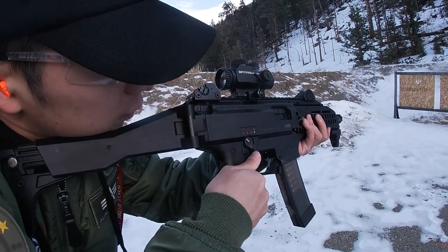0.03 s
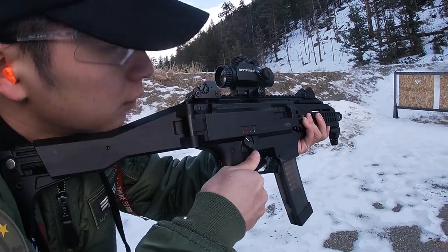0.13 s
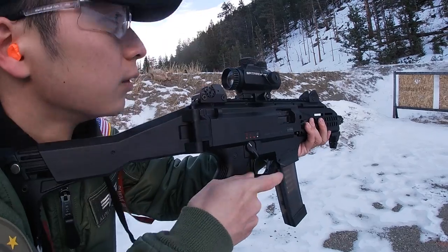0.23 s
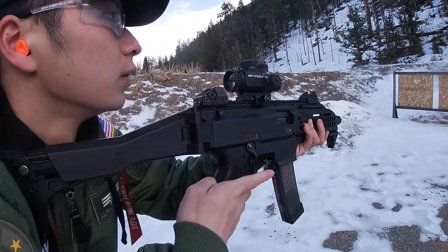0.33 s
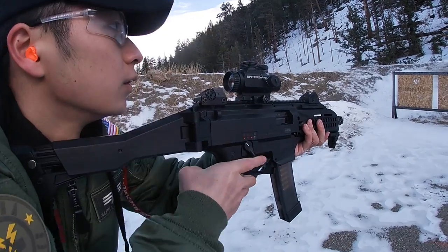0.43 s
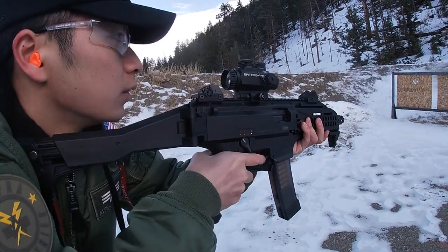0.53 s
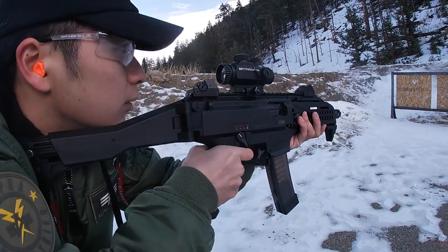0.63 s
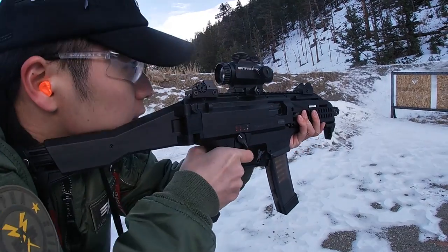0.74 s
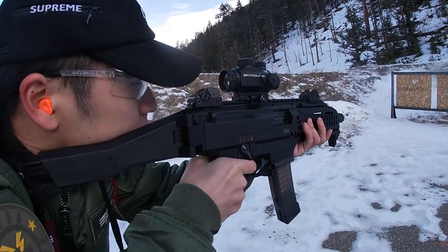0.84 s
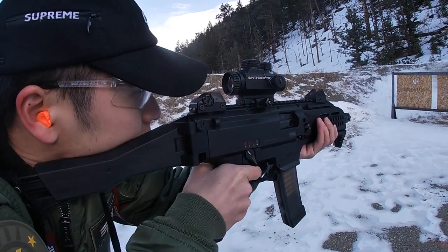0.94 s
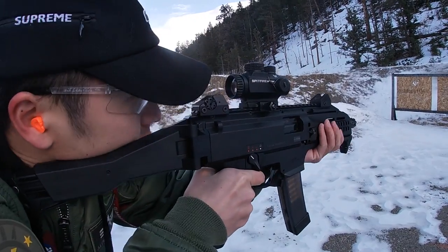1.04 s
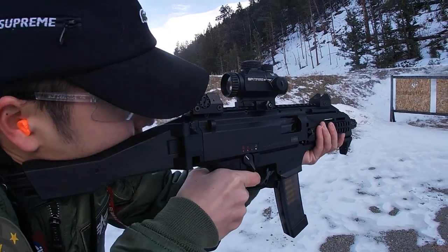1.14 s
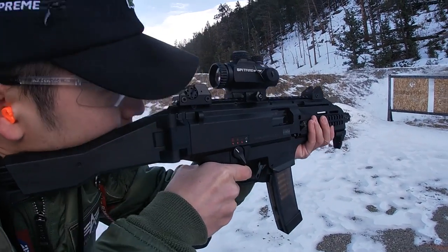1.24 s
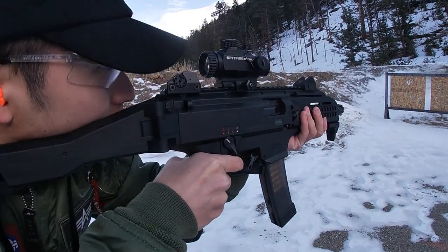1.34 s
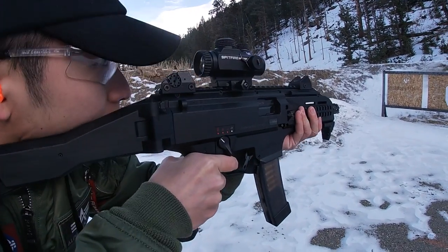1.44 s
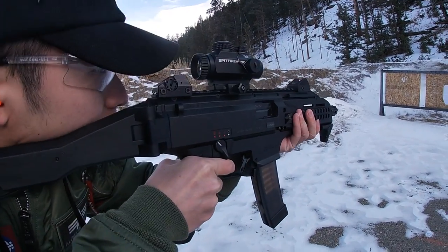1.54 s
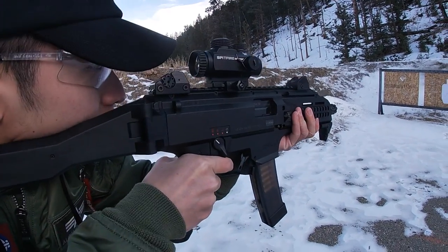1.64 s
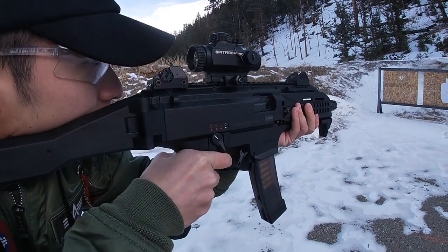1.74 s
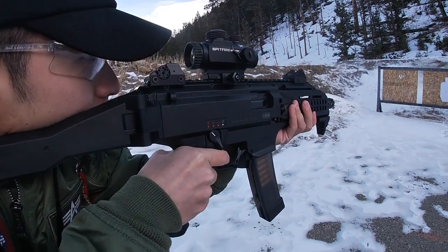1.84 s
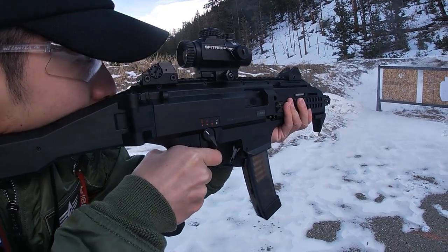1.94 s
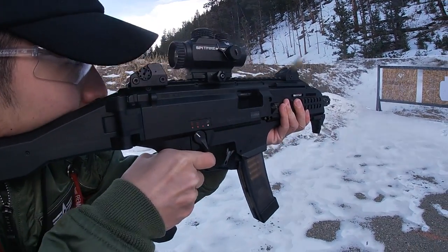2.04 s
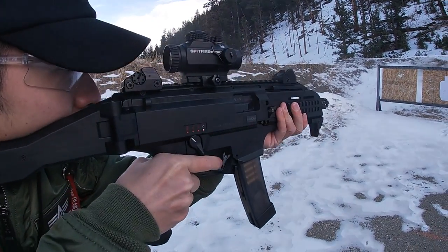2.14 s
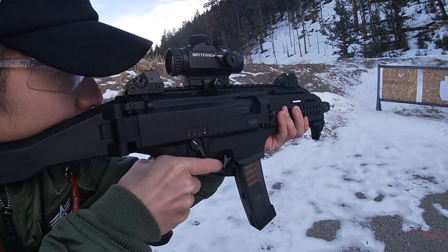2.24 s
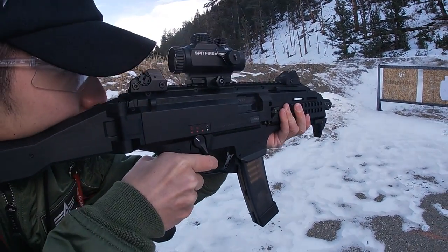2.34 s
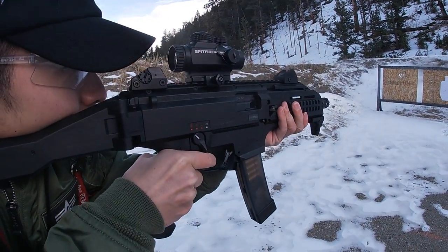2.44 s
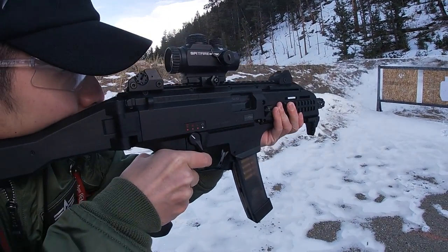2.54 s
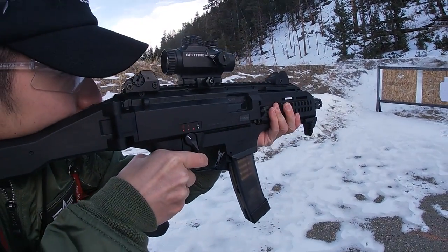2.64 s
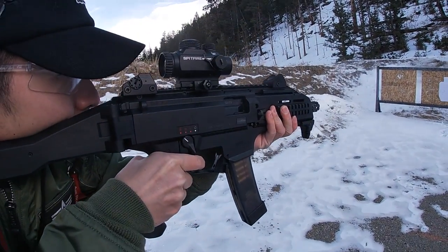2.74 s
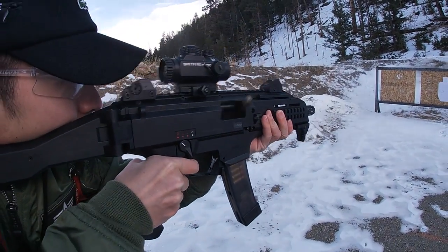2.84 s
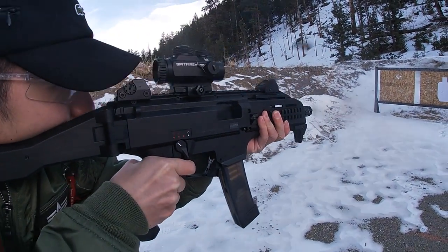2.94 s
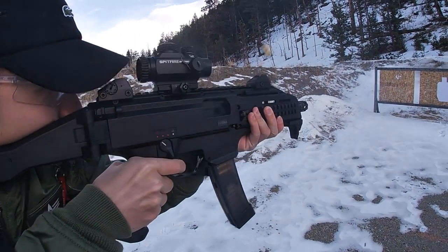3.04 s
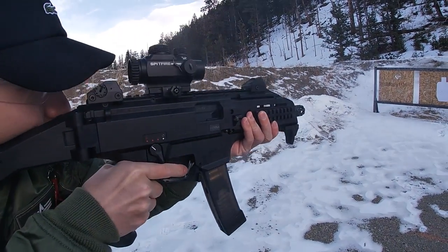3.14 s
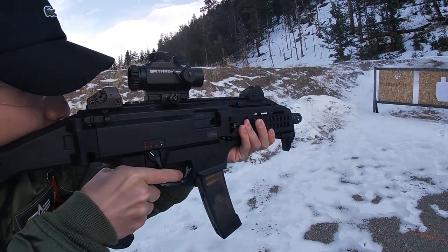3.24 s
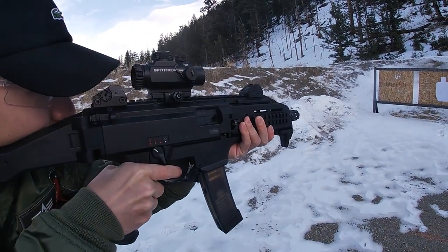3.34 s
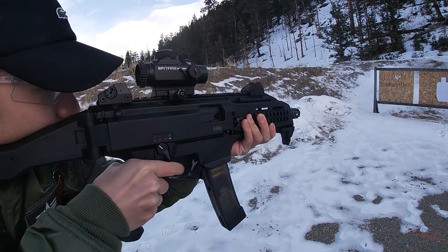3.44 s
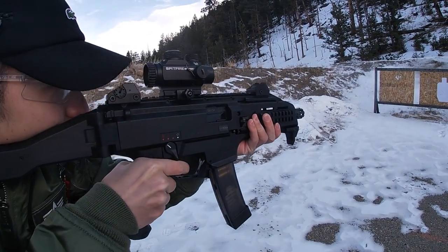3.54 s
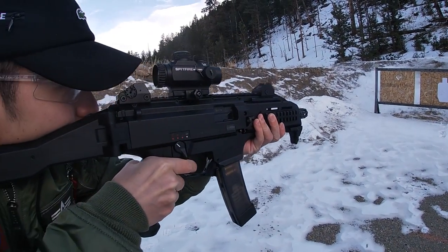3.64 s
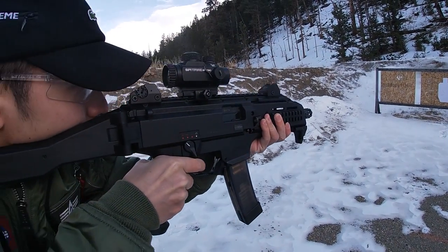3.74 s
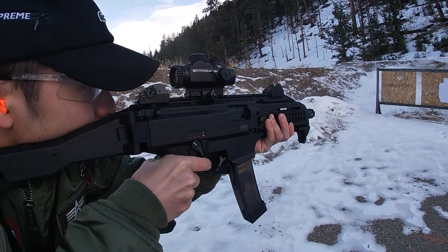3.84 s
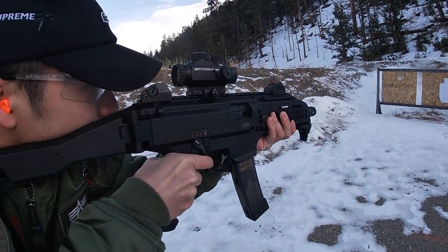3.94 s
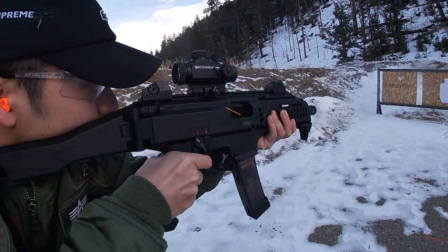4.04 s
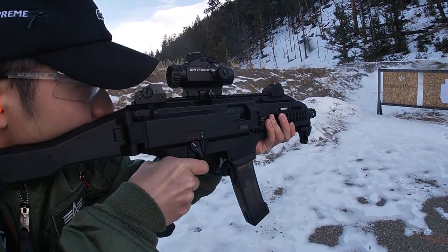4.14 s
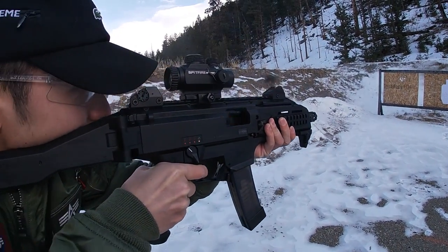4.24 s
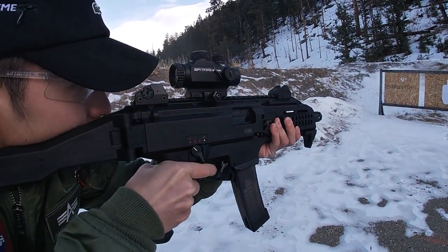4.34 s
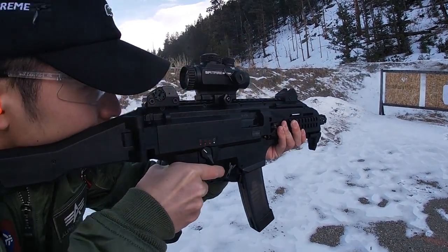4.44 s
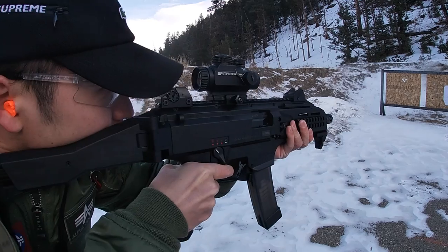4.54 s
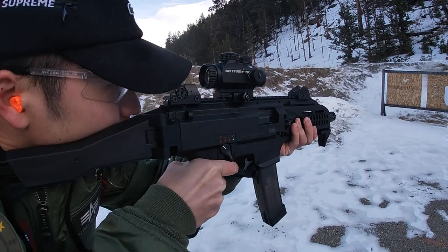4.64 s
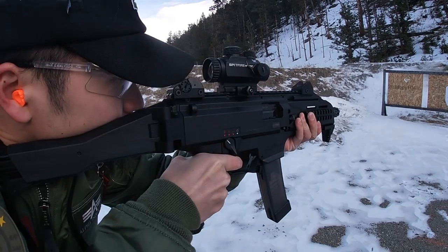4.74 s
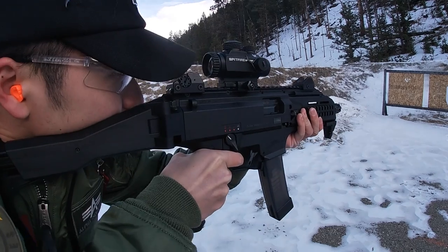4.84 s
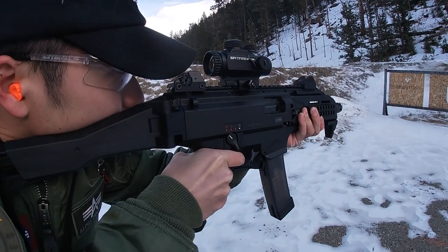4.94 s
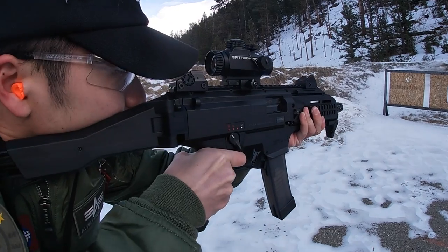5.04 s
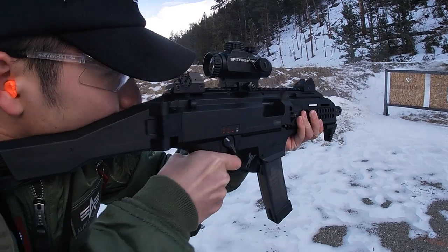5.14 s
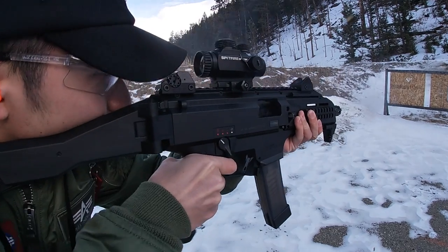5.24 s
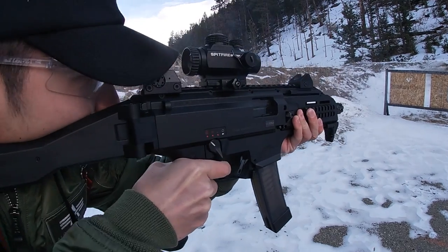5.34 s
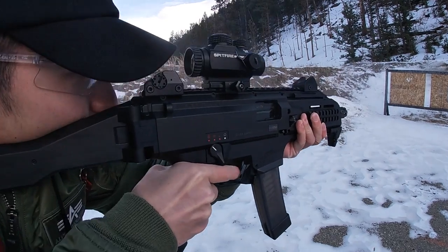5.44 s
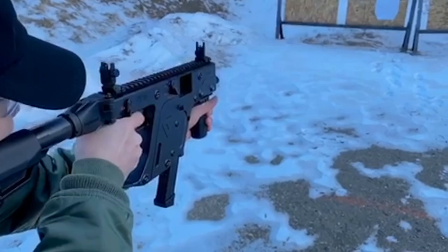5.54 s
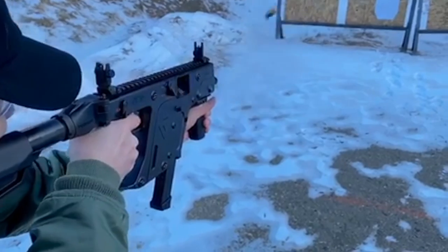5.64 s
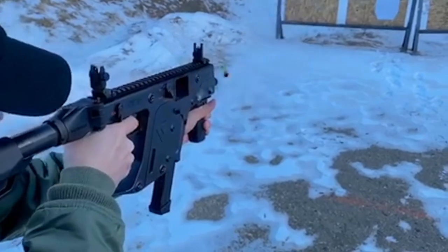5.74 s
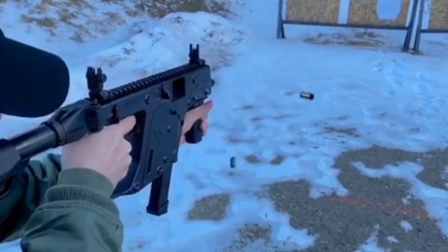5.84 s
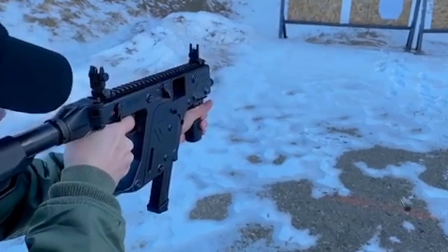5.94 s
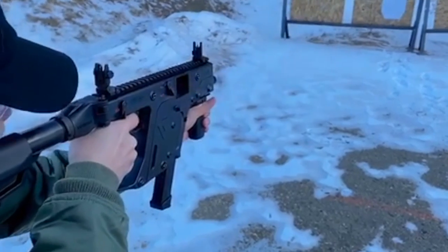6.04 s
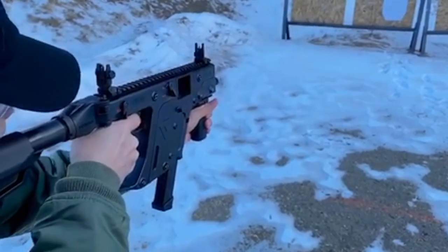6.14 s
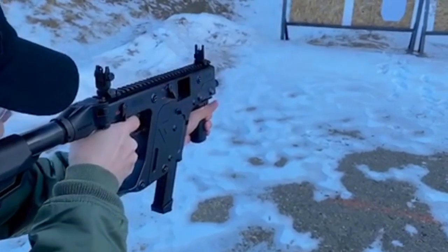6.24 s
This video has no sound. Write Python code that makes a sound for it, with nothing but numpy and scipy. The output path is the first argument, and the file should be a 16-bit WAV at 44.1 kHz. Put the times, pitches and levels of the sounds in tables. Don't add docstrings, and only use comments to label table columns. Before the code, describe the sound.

From 0 to 2 s, wind buffets a small camera microphone outdoors with low rumble, flutter and dull pops over thin hiss. A sharp metal selector snap comes at 0.1 s, followed by faint clicks, small metal pings and rustling cloth. At 2.0 s a very close automatic carbine fires three rounds in under 0.2 s, loud and distorted, each blast followed by a clattering bolt slam; brass pings and a wooded slope throws back a short echo. The gain ducks, leaving subdued air. Four-round bursts follow at 2.95 and 4.15 s, with tiny trigger ticks before the latter, then five rounds at 5.2 s. At 5.55 s the sound cuts abruptly to another gun: a drier, faster burst lasting about 0.15 s, with snappy metal and hollow housing knocks. Calm, faint hollow tree echoes and a distant wash fade until about 6.3 s.

```python
import sys
import numpy as np
from scipy import signal
from scipy.fft import rfft, irfft, next_fast_len
from scipy.io import wavfile
from scipy.ndimage import uniform_filter1d

SR = 44100
rng = np.random.default_rng(int(sys.argv[2]) if len(sys.argv) > 2 else 0)


def ratio(d):
    e = np.asarray(d, float) / 20
    return 10 ** e


def store_wav(level_fs):
    pcm = np.round(np.clip(np.atleast_2d(level_fs), -1, 1) * 32767)
    wavfile.write(sys.argv[1], SR, pcm.T.astype(np.int16))


N = 277830
TIME = np.arange(N) / SR
CUT_S = 5.553

# start in seconds, crack peak in dB, thump in dB, length in ms.
SHOTS = [(2.014, -6, -7, 14.3), (2.071, -9.5, -7.5, 13), (2.128, -8.5, -16, 13.7), (2.943, -7.5, -15, 12.2),
         (2.999, -10, -5, 9), (3.057, -10, -5, 12), (3.114, -10, -18, 12.5), (4.154, -6.5, -10, 12.7),
         (4.212, -8.5, -6.5, 10), (4.269, -11.5, -12, 12), (4.324, -13, -7, 13.5), (5.191, -9, -5, 11),
         (5.25, -12, -6, 7.6), (5.304, -12.5, -10, 10), (5.359, -12.5, 4, 9.5), (5.413, -13, -10.5, 15.3)]
# time in seconds, microphone sway in dB, slope echo in dB,
# brightness of the burst's blows in dB.
BURST_ENDS = [
    (2.196, -34.5, -37.5, 1.5),
    (3.179, -32, -40.5, -3.5),
    (4.395, -35.5, -43, -1),
    (5.477, -30.5, -44, -0.5),
    (5.745, -46, -60, -1),
]
# frequency in Hz, level in dB.
FIRST_COLOUR = [(18, -38), (30, 5), (103, -8), (148, -1.5), (277, -8.5), (411, -8), (770, -13),
                (1050, -18.5), (5620, -27), (7120, -35.5), (12000, -46.5), (14300, -61.5), (15000, -95)]
# frequency in Hz, level in dB.
SECOND_COLOUR = [(20, -44), (60, -2), (170, -14.5), (400, -9), (810, -9), (1110, -11.5), (4680, -20.5),
                 (8000, -23.5), (11300, -25), (12100, -47), (13000, -23), (14800, -31.5), (15700, -50.5)]
# frequency in Hz, level in dB.
CLICK_COLOUR = [(600, -26), (1400, 11.5), (5000, -1), (8500, -16), (10000, -24), (11000, -48.5),
                (12000, -36.5), (12800, -52), (15700, -54)]

BEFORE_SHOTS = TIME < SHOTS[0][0]
SECOND_CAMERA = TIME > CUT_S


def shape(x, points, lo_hz=0, hi_hz=3e4):
    size = next_fast_len(len(x) + 8192)
    f = np.fft.rfftfreq(size, 1 / SR) + 1
    hz, db = np.transpose(points)
    edges = np.sqrt((1 + (lo_hz / f) ** 8) * (1 + (f / hi_hz) ** 8))
    gain = ratio(np.interp(np.log(f), np.log(hz), db)) / edges
    return irfft(rfft(x, size) * gain, size)[:len(x)] / np.sqrt(np.mean(gain ** 2))


def coloured(envelope, points, lo_hz=0, hi_hz=3e4):
    return shape(envelope * rng.standard_normal(len(envelope)), points, lo_hz, hi_hz)


def patchy(points, spread_db):
    hz, db = np.transpose(points)
    f = np.geomspace(hz[0], hz[-1], num=32)
    hills = spread_db * rng.standard_normal(len(f))
    return np.transpose([f, np.interp(np.log(f), np.log(hz), db) + hills])


def walk(rate):
    k = int(SR / rate)
    steps = np.repeat(rng.standard_normal(N // k + 1), k)
    return 1.6 * uniform_filter1d(uniform_filter1d(steps, k), k)[:N]


def curve(rows, quiet_db=-120):
    s, db = np.transpose(rows)
    return ratio(np.interp(TIME, s, db, quiet_db, quiet_db))


def swell(s, db, rise_db_s, fall_db_s):
    t = TIME - s
    return ratio(db + np.where(t < 0, rise_db_s, -fall_db_s) * t)


def die_away(t, t60_s):
    return np.exp(-np.log(1000) * t / t60_s)


def add(out, s, x):
    i = int(s * SR)
    out[max(i, 0):i + len(x)] += x[max(-i, 0):N - i]


def rings(table, cycles):
    out, t = np.zeros(N), np.arange(4096) / SR
    for s, db, hz in table:
        u = t * hz / cycles
        envelope = ratio(db + 7) * u * np.exp(-u * 2.9) * 2.75
        add(out, s, envelope * np.sin(2 * np.pi * (hz * t + rng.random())))
    return out


def wind():
    # time in seconds, level in dB.
    gusts = [(0, -31.5), (.18, -29), (.252, -36.5), (.592, -30.5), (.834, -30.5), (.926, -38),
             (1.25, -28.5), (1.47, -39), (1.95, -27), (2.24, -42), (2.68, -40), (2.85, -47), (3.2, -44.5),
             (3.81, -51), (3.9, -38.5), (4.585, -46.5), (4.9, -39), (5.55, -45)]
    # frequency in Hz, level in dB.
    wind_colour = [(8.8, -34.5), (15, 0.5), (43, 2.5), (101, -5), (162, 2), (282, -9.5), (332, -12.5),
                   (500, -24), (650, -40.5), (1100, -120)]
    # frequency in Hz, level in dB.
    gust_colour = [(47, -26), (80, 5.5), (258, -8.5), (410, -17), (465, -17), (639, -30.5), (700, -36),
                   (910, -72), (1540, -120)]
    # start in seconds, peak in dB, pitch in Hz.
    pops = [(0.057, -24.5, 134), (0.136, -27.5, 109), (0.343, -19, 165), (0.408, -24, 148),
            (0.461, -23, 178), (0.521, -16.5, 147), (0.575, -16.5, 177), (0.619, -16.5, 209),
            (0.703, -39, 173), (0.752, -21, 163), (0.815, -21.5, 128), (1.161, -26, 161),
            (1.295, -28, 111.5), (1.384, -29, 168), (1.496, -26, 163), (1.555, -19, 200),
            (1.628, -17.5, 148.4), (1.754, -17.5, 166), (1.845, -20.5, 173), (1.928, -18.5, 109),
            (2.65, -28, 158), (3.9, -46.5, 107.5), (4.759, -27.5, 125), (4.882, -46, 123.8),
            (4.924, -28.5, 237), (5.874, -46.5, 95)]
    sway = sum(swell(s, db, 300, 420.5) for s, db, *_ in BURST_ENDS)
    gust = curve(gusts) + ratio(-78.5) * SECOND_CAMERA
    flutter = (gust + ratio(-8) * sway) * ratio(3.0 * walk(45) - 2.5)
    out = coloured(flutter * BEFORE_SHOTS, wind_colour, 100)
    out += coloured(flutter * ~BEFORE_SHOTS, gust_colour, 100)
    rumble_db = np.where(BEFORE_SHOTS, -1.5, np.where(SECOND_CAMERA, -10.5, 5))
    rumble = gust * ratio(rumble_db) + sway
    out += coloured(rumble * ratio(2.0 * walk(18) - 0.96), wind_colour, 0, 100)
    return out + rings(pops, 2.1)


def slope_throb():
    out = np.zeros(N)
    for s, *_ in SHOTS:
        for delay_s in (.058, .275):
            add(out, s + delay_s, 10.5 * np.exp(-TIME[:4096] * 1000 / 3.7))
    return uniform_filter1d(out, size=128)


def distant_air():
    # low edge in Hz, high edge in Hz, steady hiss in dB, echo in dB,
    # echo rise in dB/s, echo fall in dB/s.
    far_bands = [
        (338, 1383, -38.5, -1, 400, 49),
        (1380, 3000, -60.5, -2.5, 248.5, 62.5),
        (3000, 5200, -76, -9.5, 250, 78),
        (5200, 16000, -85, -14, 249, 105),
    ]
    late_tilt_db = [-2.5, -5.5, -14.5, -26]
    # frequency in Hz, level in dB.
    far_colour = [(250, 1.5), (400, 5), (800, 6.5), (1200, -0.5), (1900, 2.5), (3000, -5.5), (4000, -7.5),
                  (6000, -4), (7500, -22), (10000, -26.5), (12300, -33), (15500, -54.5)]
    # time in seconds, gain in dB.
    duck = [(2, -22), (2.75, -29), (2.94, -23), (3.75, -28.5), (4.1, -16.5), (4.75, -35.5), (5.15, -25),
            (5.56, -10)]
    ducked_db = np.interp(TIME, *np.transpose(duck))
    duck_db = np.where(BEFORE_SHOTS, 0, np.where(SECOND_CAMERA, -31, ducked_db))
    late_echo = swell(6, -51, 59, 75.5) * SECOND_CAMERA
    unevenness_db = np.where(BEFORE_SHOTS, .63, np.where(SECOND_CAMERA, 2.2, 1.6))
    throb = slope_throb()
    out = np.zeros(N)
    for (lo, hi, hiss_db, echo_db, rise, fall), late_db in zip(far_bands, late_tilt_db):
        echo = 0
        for s, _, db, _ in BURST_ENDS:
            same_camera = SECOND_CAMERA == (s > CUT_S)
            echo = echo + swell(s + 0.032, db + echo_db, rise, fall) * same_camera
        level = ratio(hiss_db + duck_db) + echo * ~BEFORE_SHOTS + ratio(late_db) * late_echo
        out += coloured(level * ratio(throb + unevenness_db * walk(25) - 2.5), far_colour, lo, hi)
    out += coloured(ratio(-12) * late_echo, far_colour, 170, 380)
    return out + coloured(swell(6, -72, -1, 103.5) * SECOND_CAMERA, SECOND_COLOUR, 8700)


def thin_hiss():
    colour = [(7200, -36), (7320, 0), (7480, 0), (7620, -12.5), (7880, 0), (8000, -31), (8450, -36.5),
              (8525, -2.5), (8600, -41.5), (11400, -40.5), (11900, -24.5), (12500, -26), (12800, -45)]
    level = swell(1.4, -79.5, .5, 70) * BEFORE_SHOTS
    return coloured(level * ratio(3 * walk(30) + 2.5 * walk(5)), colour)


def clicks():
    # start in seconds, peak in dB, pitch in Hz.
    click_events = [(0.0014, -38, 2540), (0.113, -22, 2100), (0.162, -42, 2950), (0.219, -39.5, 3500),
                    (0.243, -45, 2860), (0.3591, -54, 2600), (0.6312, -48, 3820), (0.656, -59, 2630),
                    (0.713, -48, 3060), (0.768, -42, 2750), (0.802, -45, 2530), (0.8594, -44, 3200),
                    (0.877, -42, 2530), (0.9462, -47, 2710), (0.9854, -55, 2680), (1.069, -44, 5000),
                    (1.951, -46.5, 2530), (3.184, -27.5, 5500), (3.7763, -60, 4100), (3.9744, -63, 2720),
                    (4.0619, -61, 4900), (4.393, -27, 5170), (5.0644, -60, 2520), (5.0857, -57, 3400),
                    (5.5503, -55.5, 5970), (5.5872, -30, 9600), (5.778, -43, 2970), (5.854, -53, 3650),
                    (6.24, -45, 2550)]
    lead_s = .01
    out, t = np.zeros(N), np.arange(8192) / SR - lead_s
    impulse = 1. * (np.arange(len(t)) == np.argmax(t > 0))
    fall = (t > 0) * die_away(t, 0.012)
    for s, db, hz in click_events:
        colour = CLICK_COLOUR if s < CUT_S + .01 else SECOND_COLOUR
        edge = coloured(fall, colour, 1600) + ratio(8.0) * shape(impulse, colour, 1200)
        ring = coloured(fall ** .5, [(hz, -30), (hz, 0), (hz * 1.9, -30)], 1500, 9000)
        add(out, s - lead_s, ratio(db - 3) * (edge + ratio(-12) * ring))
    return out


def jacket():
    # time in seconds, level in dB.
    rustle = [(0, -88), (.27, -68), (.33, -65), (.39, -66), (.46, -61.5), (.53, -61), (.6, -64.5),
              (.72, -61), (.84, -66), (1.08, -69.5), (1.9, -89.5)]
    grains = rng.random(N) < 3000 / SR
    size_db = 3.2 * np.minimum(rng.exponential(size=N), 3)
    fibres = grains * ratio(size_db) * ratio(2.5 * walk(40))
    fibres = signal.lfilter([1], [1, -.985], fibres)
    return coloured(curve(rustle) * fibres / np.std(fibres), CLICK_COLOUR, 1000, 7500)


def selector():
    # frequency in Hz, level in dB, time to fall 60 dB in seconds.
    modes = [(1480, -7, 0.011), (1840, -4, 0.013), (2520, 2.5, 0.018), (3520, 3, .02), (4650, 2.5, 0.023),
             (5300, -10, 0.031), (6100, -12.5, 0.051), (6900, -11, .04), (8100, -6.5, 0.04),
             (8530, -6.5, 0.04), (11800, -33, .05), (14000, -28, .02), (15300, -30, .015)]
    out, t = np.zeros(N), np.arange(4096) / SR
    x = 0
    for hz, db, t60 in modes:
        fall = die_away(t, 0.0058) + ratio(-12.5) * die_away(t, t60)
        beat = np.cos(2 * np.pi * (60 + 120 * rng.random()) * t)
        x = x + ratio(db) * fall * np.sin(2 * np.pi * (hz * t + rng.random())) * beat
    add(out, .1113, ratio(-12.5) * x * (1 - np.exp(-t / 0.00029)))
    return out


def smears():
    # end of the swell in seconds, lead in ms, level in dB, thump in dB, band width in Hz.
    smear_events = [
        (0.113, 25, -41, -58, 130),
        (2.016, 32.1, -14, -19.5, 26.2),
        (2.943, 30, -31, -33.5, 50.4),
        (4.155, 27, -24, -27, 24.9),
        (5.193, 27, -32, -40, 120.3),
        (5.584, 21.1, -22.5, -24.5, 116),
    ]
    # frequency in Hz, level in dB.
    smear_bands = [
        [(4110, 2), (4640, -6), (5300, 2), (6190, -7), (7260, -6), (8060, 2), (8540, -9)],
        [(1076, -9.5), (2265, -8), (2766, -4.5), (3320, -11), (3600, -14.5), (4000, -21.5), (4800, -20.5),
         (4500, -21), (4960, -14.5), (5350, -10.5), (5760, -20), (5900, -26.5), (7450, -21), (8850, -32.5),
         (9130, -35.5)],
        [(711, 4), (980, 1), (2010, -25), (2680, -27), (3220, -10), (3330, -7), (4260, -4), (4540, -20),
         (4830, -14.5), (5290, -16), (5850, -13), (6870, -29)],
        [(888, -5.5), (1080, -6), (1350, -4), (1820, -25), (3040, -4), (3230, 1.5), (4370, -11.5), (5390, -10),
         (5940, -10.5), (6420, -29), (7730, -21), (11500, -30), (12500, -43)],
        [(592, 1), (1230, -8), (2450, -24), (4170, -15), (4450, -17), (5360, -7), (5810, -6.5), (7320, -28)],
        [(1830, -2.5), (2540, -2), (4100, -12), (4900, -10), (6000, 1), (5400, 1), (7000, -5)],
    ]
    low_colour = [(60, -21.0), (120, -1.5), (230, 8.5), (340, 14.0), (500, -40.5)]
    out = np.zeros(N)
    for (s, ms, db, thump_db, width), bands in zip(smear_events, smear_bands):
        t = np.arange(int(ms * 1.4e-3 * SR)) / SR
        k = int(SR / max(width * 2.5, 180))
        x = 0
        for hz, band_db in bands:
            beat = rng.standard_normal((2, 4096))
            beat = uniform_filter1d(uniform_filter1d(beat, k), k)[:, :len(t)]
            beat = beat / np.sqrt(np.hypot(*beat))
            tone = beat[0] * np.cos(2 * np.pi * hz * t) + beat[1] * np.sin(2 * np.pi * hz * t)
            x = x + ratio(band_db) * tone / np.sqrt(np.mean(beat ** 2))
        low = coloured(np.ones(4096), low_colour)[:len(t)]
        bed = coloured(np.ones(len(t)), patchy(FIRST_COLOUR, 8.7), 1600, 7300)
        x = ratio(db) * (x / np.std(x) + bed / 4.5) + ratio(thump_db) * low
        rise = np.sin(np.pi / 2 * t / t[-1]) ** 2.5
        stop = 1 - np.exp((t - t[-1]) / .001)
        add(out, s - t[-1], x * rise * stop)
    return out


def faint_ticks():
    # start in seconds, peak in dB, pitch in Hz.
    ticks = [(.272, -60, 4500), (.322, -57, 5000), (.415, -58, 4300), (.466, -51, 5500), (.505, -55, 4500),
             (.588, -56, 6500), (1.043, -58, 4500), (3.822, -75, 5500), (3.874, -68, 5500),
             (3.903, -73, 4800), (3.99, -69, 5020), (4.024, -70, 5000), (4.074, -65, 5200),
             (4.114, -56, 4950), (5.103, -59.5, 4100), (5.115, -63, 4500), (5.153, -70, 3500)]
    out, t = np.zeros(N), np.arange(8192) / SR
    for s, db, hz in ticks:
        colour = [(hz / 2.2, -30), (hz / 1.1, -3), (hz, 0), (hz * 1.2, -8), (hz * 2.2, -35)]
        add(out, s, ratio(db) * coloured(np.exp(-t / 0.0014), colour, 1500, 11000))
    return out


def brass_cases():
    # start in seconds, frequency in Hz, peak in dB, time to fall 60 dB in seconds.
    pings = [(0.451, 3930, -39, 0.064), (0.453, 3780, -42, 0.047), (.457, 4130, -44, 0.053),
             (.4, 9150, -68, 0.11), (.59, 7750, -54, 0.037), (2.19, 8190, -37, 0.062),
             (4.393, 8300, -41, 0.035), (5.476, 8200, -39, 0.05), (6.24, 11500, -54, 0.16)]
    out, t = np.zeros(N), np.arange(8192) / SR
    envelope = (1 + 0.57 * np.sin(2 * np.pi * 55 * t)) * (1 - np.exp(-t / 0.0035)) ** 2
    for s, hz, db, t60 in pings:
        add(out, s, ratio(db) * envelope * np.sin(2 * np.pi * hz * t) * die_away(t, t60))
    return out


def lurches():
    # centre in seconds, peak in dB, pitch in Hz.
    lurch_events = [(1.9986, -7, 240), (2.0099, -0.5, 233), (2.0123, -14.5, 45), (2.0177, -9, 330),
                    (2.0217, -6, 218), (2.0323, -13.5, 112), (2.0662, -7, 330), (2.0762, -6, 105),
                    (2.0857, -13, 132), (2.0863, -15, 41), (2.1248, -9, 67.4), (2.174, -16.5, 49),
                    (2.1799, -7, 150), (2.9494, -8.5, 170), (2.9564, -11, 50.4), (2.9926, -9.5, 304),
                    (2.9997, -18, 201), (3.0056, -7.5, 332), (3.0063, -11.7, 34), (3.0573, -7.0, 145),
                    (3.0635, -17, 34.7), (3.0683, -8.5, 146), (3.111, -9, 74), (3.1122, -12.5, 170),
                    (3.1688, -6, 158), (4.1618, -12.5, 103), (4.1624, -9.5, 325), (4.171, -7, 121),
                    (4.211, -13.5, 80), (4.2177, -8.5, 327), (4.222, -6, 144), (4.2649, -14.5, 144),
                    (4.2698, -11.5, 35), (4.274, -6, 330), (4.279, -5.5, 154), (4.3206, -15.0, 45),
                    (4.3222, -11.5, 310), (4.3257, -6.5, 131), (4.3372, -7, 144), (4.3745, -17.5, 38.3),
                    (4.3782, -14.5, 112), (5.2002, -11, 95), (5.1995, -5, 338), (5.2077, -13, 201),
                    (5.2469, -9, 122), (5.2522, -11, 34.7), (5.2535, -12.5, 335), (5.26, -9.5, 144),
                    (5.2975, -3.5, 340), (5.3046, -4, 144), (5.354, -14, 144), (5.3661, -8, 328),
                    (5.3665, -12.5, 68), (5.4065, -8.5, 257), (5.422, -8.4, 326), (5.4249, -9, 40.3),
                    (5.4654, -8.5, 340), (5.4697, -13.5, 136)]
    out, t = np.zeros(N), np.arange(8192) / SR
    middle_s = t[4096]
    for s, db, hz in lurch_events:
        cycles = (t - middle_s) * hz
        bump = np.exp(-(cycles / 0.39) ** 2 / 2)
        add(out, s - middle_s, ratio(db) * bump * np.sin(2 * np.pi * (cycles + rng.random())))
    return out


def blows(table, colour, top_db, tail_db, tail_ms, thump_stretch, grain_db, lead_db, rise_ms, rear_db=-90):
    lead_ms = 30
    out, t = np.zeros(N), np.arange(8192) / SR * 1000 - lead_ms
    after = np.maximum(t, 0)
    rise = 1 - np.exp(-after / rise_ms)
    spring = coloured(np.ones(16384), [(5300, -30), (5800, 0), (6200, -30)], 4500, 7000)
    rear_stop = ratio(rear_db) * np.exp(-((after - 17) / 1.4) ** 4)
    for s, crack_db, thump_db, ms, *own_db in table:
        lead_in = coloured((t < 0) * np.exp(t / 8 * (t < 0)), colour, 1400, 12000)
        lead_in *= ratio(crack_db + lead_db)
        song = spring[int(s * SR) % 4096:][:len(t)]
        lead_in += ratio(crack_db + rear_db - 22) * np.exp(-after / 40) * rise * song
        hold = rise * (np.exp(-(after / ms) ** 2) + ratio(tail_db) * np.exp(-after / tail_ms) + rear_stop)
        roar = hold * ratio(grain_db * np.repeat(rng.standard_normal(128), 64))
        crack = ratio(crack_db - 6) * coloured(roar, patchy(colour, 1.5), 450, 6500)
        bright_db = next(row[-1] for row in BURST_ENDS if row[0] > s) + sum(own_db)
        top = coloured(roar * np.exp(-after / 12), colour, 6500)
        top *= ratio(top_db + bright_db + 0.55 * crack_db)
        slow = np.exp(-(after / (ms * thump_stretch)) ** 2) + ratio(-20) * np.exp(-after / 40)
        thump = coloured(slow * (1 - np.exp(-after / 1.1)), colour, 65, 420)
        thump = 2.1 * np.tanh(thump / 1.39)
        thump *= ratio(thump_db - 13 * (s < CUT_S))
        fade_in = np.minimum((t + lead_ms) / 15, 1)
        add(out, s - lead_ms / 1000, (lead_in + crack + top + thump) * fade_in)
    return out


def first_gun():
    # start in seconds, crack peak in dB, thump in dB, length in ms.
    bolts = [(2.062, -5.5, -9, 8.4), (2.12, -7, -2.5, 9.6), (2.176, -4.5, -9.5, 4.6),
             (2.989, -5, -0.5, 8.4), (3.046, -8.5, -9, 9.3), (3.104, -9.5, -2.5, 8.6),
             (3.163, -8, -15, 7.4), (4.203, -6, -5, 7.7), (4.257, -8, -14, 7.9), (4.318, -9.5, -18, 14.5),
             (4.372, -9.5, -5.5, 8.3), (5.239, -11, -26.5, 17), (5.294, -12.5, -5, 11),
             (5.35, -10, -11.5, 14), (5.405, -7.5, -15, 5.3), (5.46, -9, -10, 7.6)]
    blasts = blows(SHOTS, FIRST_COLOUR, top_db=-26.5, tail_db=-10.0, tail_ms=23.0, thump_stretch=1.0,
                   grain_db=2.3, lead_db=-36.5, rise_ms=0.78, rear_db=-20.5)
    slams = blows(bolts, FIRST_COLOUR, top_db=-29.0, tail_db=-19.0, tail_ms=7.8, thump_stretch=1.4,
                  grain_db=1.7, lead_db=-22.5, rise_ms=0.77)
    return blasts + slams


def sizzle(blasts):
    level = swell(2.07, -22, 10, 220) * uniform_filter1d(abs(blasts), size=64)
    return coloured(level, [(11000, -26.5), (13000, -8.5), (15500, 1.0), (16500, -19.0)])


def trigger_spring():
    # start in seconds, frequency in Hz, peak in dB, time to fall 60 dB in seconds.
    twangs = [(3.777, 11800, -81, .03), (3.982, 11250, -91, .15), (4.062, 11700, -78.5, 0.038),
              (5.085, 11300, -69, 0.052), (5.1, 11200, -73.5, .12), (5.125, 11300, -76, .1)]
    out, t = np.zeros(N), np.arange(8192) / SR
    for s, hz, db, t60 in twangs:
        tone = np.sin(2 * np.pi * hz * t) * (1 - np.exp(-t / 0.0019))
        add(out, s, ratio(db) * tone * die_away(t, t60))
    return out


def second_gun():
    # start in seconds, crack peak in dB, thump in dB, brightness in dB.
    second_blows = [(5.581, -8.5, -14, -22), (5.587, -15.5, -30, -2.5), (5.594, -16.5, -17, -1.5),
                    (5.63, -29.5, -33.5, 6), (5.634, -12.5, -28, -0.5), (5.64, -13.5, -37.5, -1.5),
                    (5.646, -23.5, -31, 3.5), (5.671, -25.5, -44, 5), (5.676, -14, -43.5, 0.5),
                    (5.683, -14.5, -29, -4.5), (5.69, -26, -32, 3), (5.712, -27, -56, 1),
                    (5.724, -12.5, -26.5, -2)]
    # start in seconds, peak in dB, pitch in Hz.
    knocks = [(5.589, -20, 890), (5.637, -15, 640), (5.677, -15.5, 734), (5.684, -13.5, 724),
              (5.7245, -10, 813)]
    # start in seconds, peak in dB, pitch in Hz.
    snaps = [(5.5868, -12, 9900), (5.587, -26, 14460), (5.594, -28.5, 10500)]
    length_ms = 5
    table = [row[:3] + (length_ms, row[3]) for row in second_blows]
    out = blows(table, SECOND_COLOUR, top_db=-25.0, tail_db=-17.5, tail_ms=13.0, thump_stretch=1.0,
                grain_db=3.0, lead_db=-31.5, rise_ms=1.0)
    return out + rings(knocks, 2.4) + rings(snaps, 11)


def tree_returns():
    # start in seconds, peak in dB, pitch in Hz.
    returns = [(5.898, -46, 760), (5.919, -40, 902), (5.935, -39, 721), (5.951, -35, 820),
               (5.969, -37, 880), (5.993, -35, 865), (6.003, -40, 780), (6.13, -64, 735), (6.182, -58, 865),
               (6.196, -48.5, 850), (6.218, -45, 1043)]
    return rings(returns, 2.2)


def valley():
    # start in seconds, peak in dB, pitch in Hz.
    late_returns = [(5.778, -44, 875), (5.79, -50, 1490), (6.13, -52, 777), (6.259, -56, 1060)]
    # time in seconds, level in dB.
    wash = [(5.85, -75), (5.93, -54), (5.97, -51.5), (6.04, -56), (6.1, -63), (6.2, -63), (6.3, -64)]
    # frequency in Hz, level in dB.
    wash_colour = [(450, -20), (680, -5), (840, 0), (1050, -4), (1300, -5), (1550, -14), (1950, -8),
                   (2500, -14), (3200, -30)]
    return rings(late_returns, 4.3) + coloured(curve(wash) * ratio(1.5 * walk(30)), wash_colour, 300, 3500)


def scene():
    first = first_gun()
    loud = first + second_gun() + lurches() + faint_ticks() + trigger_spring() + valley()
    air = wind() + distant_air() + thin_hiss() + tree_returns()
    handling = clicks() + jacket() + selector() + brass_cases()
    return (np.tanh(loud) + air + handling + smears() + sizzle(first))[None]


def band_limit(x):
    return signal.sosfilt(signal.butter(12, 15750, fs=SR, output="sos"), x)


def record(dry):
    # frequency in Hz, level in dB.
    first_top = [(20, 0.5), (10200, 1.5), (10900, -7), (11600, 0.5), (12400, -2.5), (12900, -11.5),
                 (13600, -13), (15000, -23.5), (16000, -43.5)]
    x = np.clip(dry[0], -.9, .9)
    x = np.where(TIME < CUT_S, ratio(-2) * shape(x, first_top), x)
    low_pass = signal.ellip(10, .2, 90, 15750, fs=SR, output="sos")
    x = signal.sosfilt(low_pass, x)
    return band_limit(x[None])


dry = scene()
out = record(dry)
store_wav(out)
```